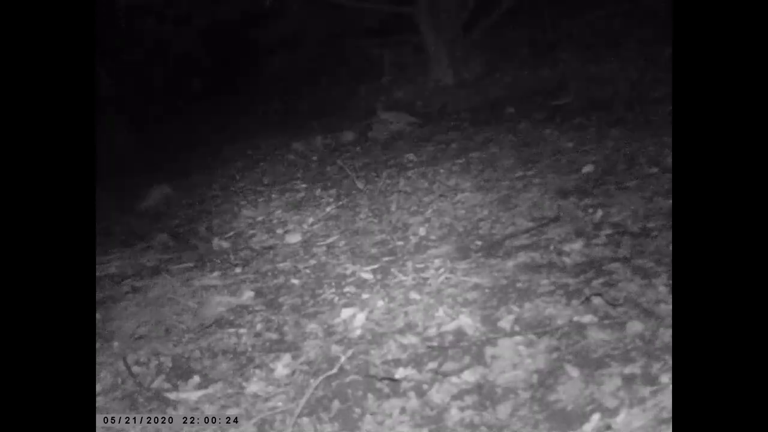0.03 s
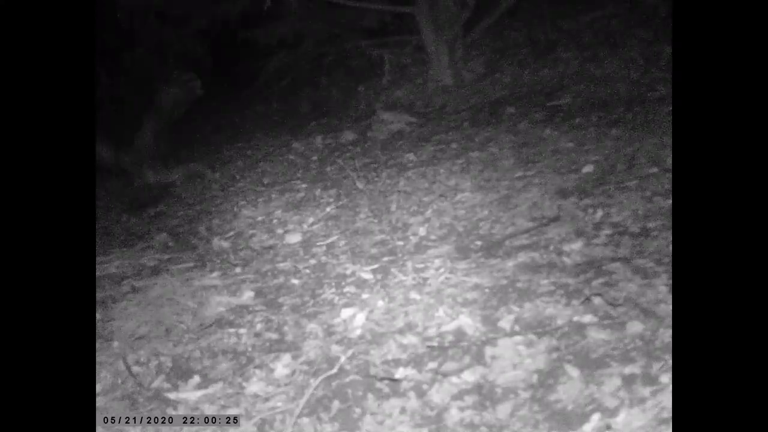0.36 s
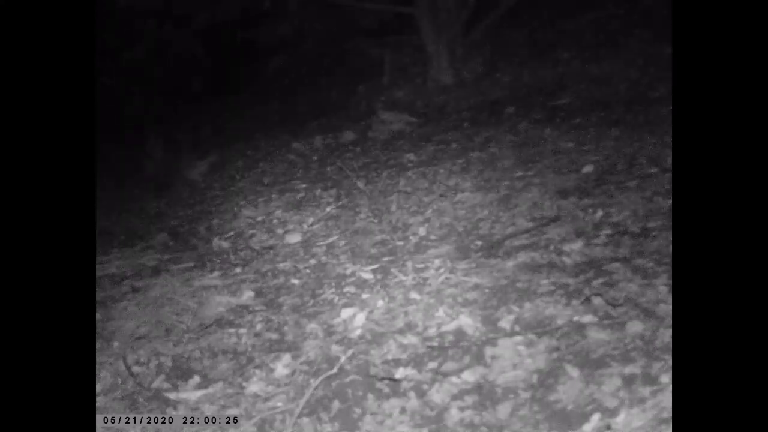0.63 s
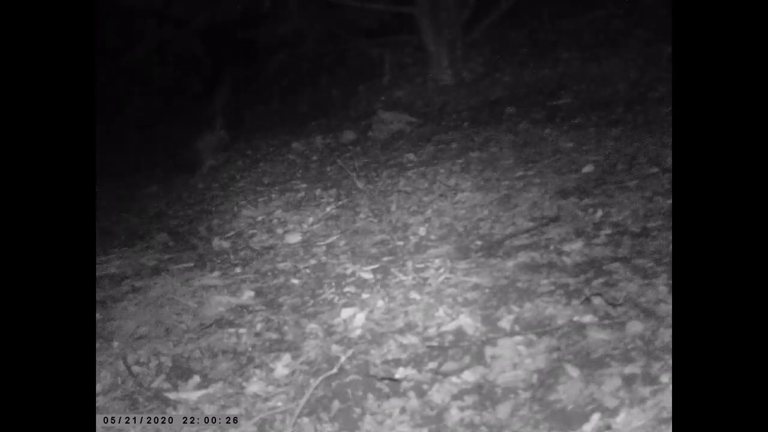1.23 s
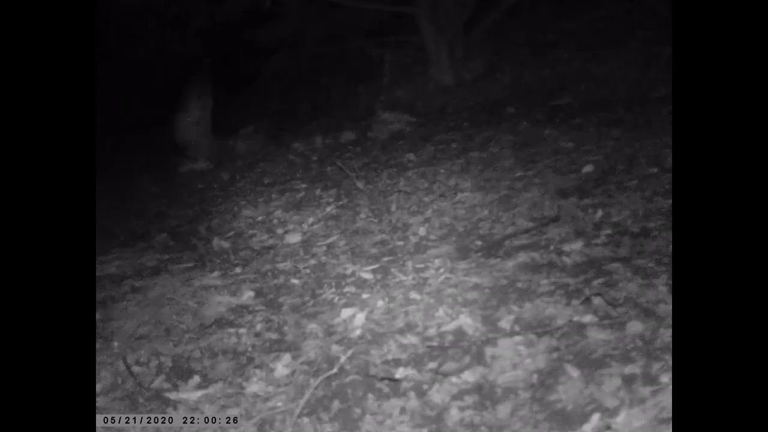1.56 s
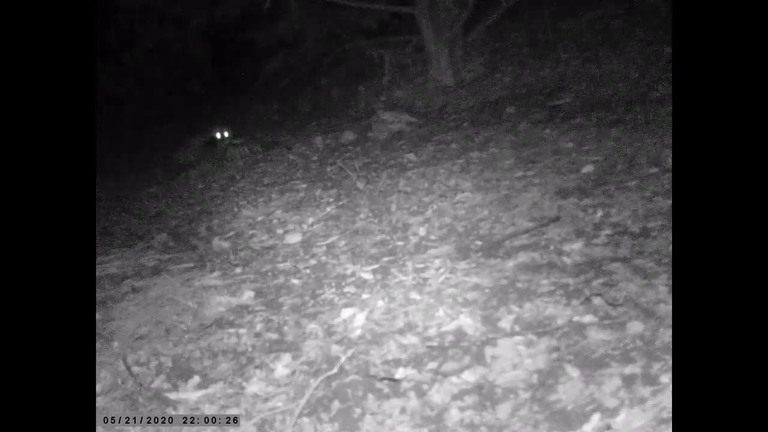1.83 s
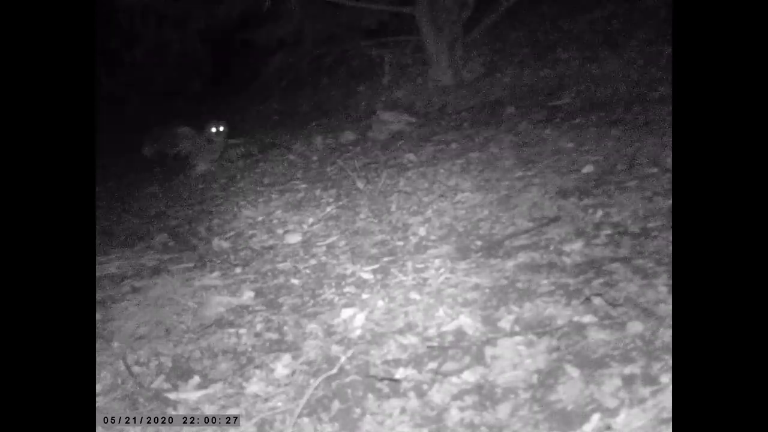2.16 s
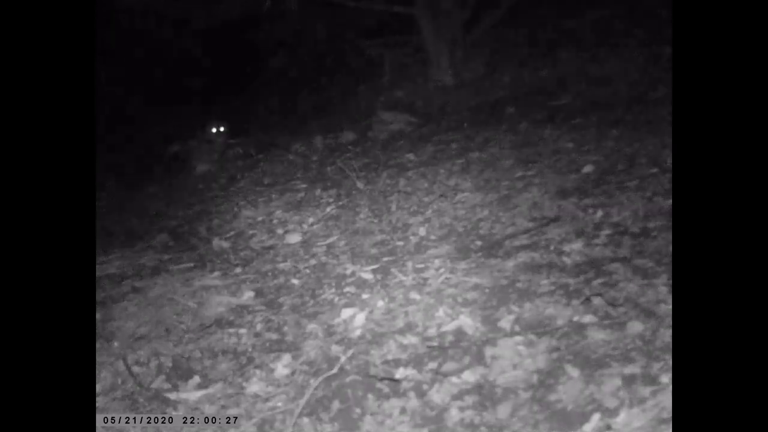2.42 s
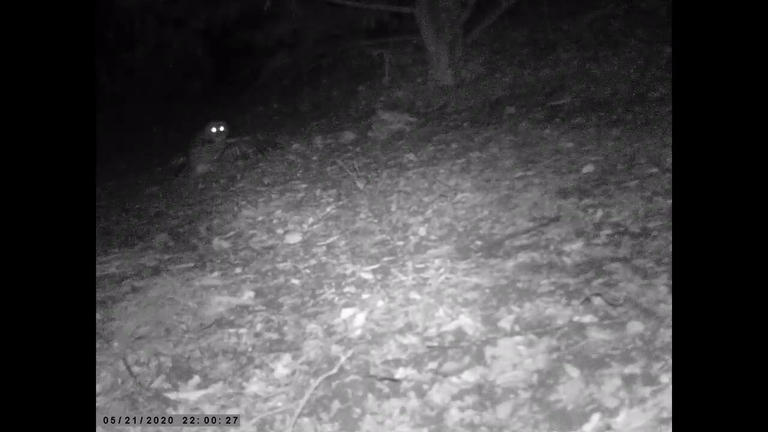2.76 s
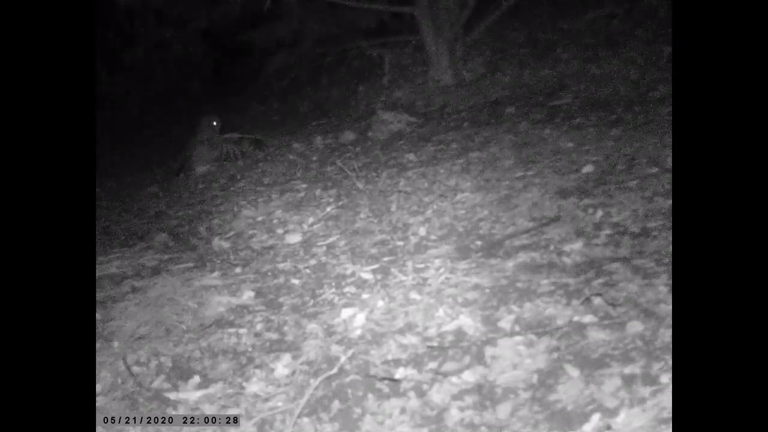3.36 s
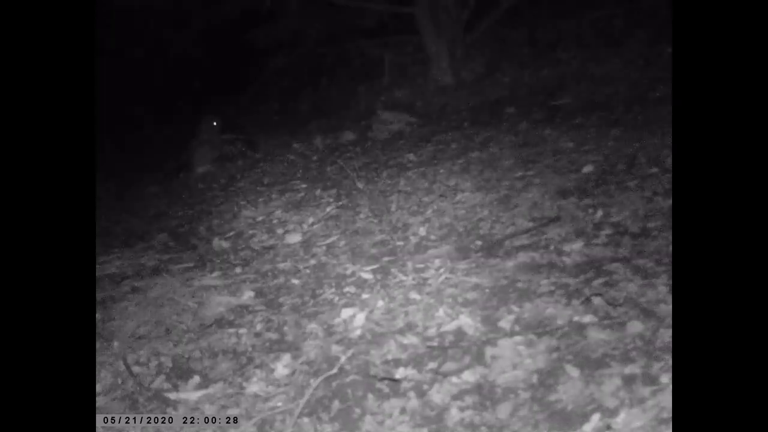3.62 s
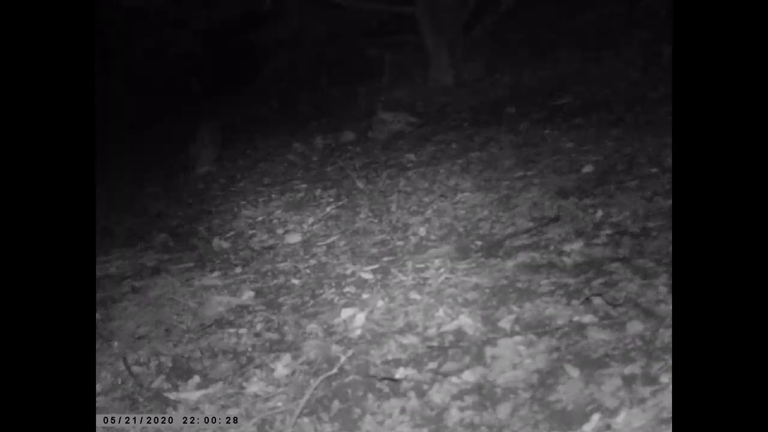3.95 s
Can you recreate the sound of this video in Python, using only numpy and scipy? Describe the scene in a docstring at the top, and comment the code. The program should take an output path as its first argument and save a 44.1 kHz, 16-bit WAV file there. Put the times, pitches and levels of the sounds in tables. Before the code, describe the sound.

A small animal squeals twice, loud and harsh, over steady hiss and low hum.

```python
"""Among trees at night, a small animal squeals twice, well clear of the background. Each cry is a stack of
harmonics shaped by the throat: it starts clear, sinks in pitch and turns hoarse, and the ground, a near trunk
and the wood throw it back to the microphone. Underneath lie the camera's own hiss, rumble and a low hum that
keeps cutting out with soft thumps. Dull bumps, dry leaves and two faint high chirps fill in the background;
brief crackles sound within the cries, and tiny ticks come and go."""
import sys
import numpy as np
from scipy import signal
from scipy.fft import rfft, irfft
from scipy.io import wavfile
from scipy.ndimage import uniform_filter1d

SR = 44100
rng = np.random.default_rng(int(sys.argv[2]) if len(sys.argv) > 2 else 0)


def generate_wav(sig):
    """Save sig (samples, or channels by samples) to the path in sys.argv[1] as 16-bit PCM at SR."""
    pcm = np.round(np.clip(np.atleast_2d(sig).T, -1, 1) * 32767).astype(np.int16)
    wavfile.write(sys.argv[1], SR, pcm)


N = 176400

# the two cries, direct to the microphone
# (time [s], pitch [Hz], level [dB], roughness [0-1], pinch of the throat [0-1])
SQUEALS = [
    [(.879, 1037, -51, 0.1, 0.1), (.886, 1001, -29, 0, 0.1), (.912, 972, -24, 0.1, 0.1),
     (.944, 933.5, -19, .06, 0), (.963, 910, -16.5, 0.1, 0.15), (.975, 896.5, -19.5, 0.2, 0.2),
     (.998, 871, -17, 0.2, 0.3), (1.02, 852, -16, 0.22, 0.43), (1.03, 819, -17.5, 0.24, 0.1),
     (1.048, 818, -14.5, 0.26, 0.1), (1.058, 790.6, -15, 0.28, 0.2), (1.078, 791, -13.5, 0.14, 0),
     (1.096, 785.4, -19, 0.38, 0.4), (1.112, 775, -22.5, .5, 0.6), (1.128, 797, -18.5, 0.4, 0.35),
     (1.137, 752, -28.5, 1, 0.7)],
    [(1.288, 912, -46, 0.04, 0.03), (1.299, 937, -30.5, 0.14, 0), (1.339, 945.4, -19.5, 0, 0),
     (1.359, 908, -20.5, 0.03, 0), (1.371, 898.5, -18.5, 0.02, 0), (1.385, 919, -23.5, 0.2, 0.5),
     (1.401, 943, -20.5, .1, 0.1), (1.439, 869, -23, 0, 0), (1.467, 878.4, -17.5, .1, 0.05),
     (1.482, 875, -14.5, 0, 0.14), (1.492, 799, -21, 0.56, 0.2), (1.504, 807, -25, 0.7, 0.6),
     (1.52, 772, -21, 0.3, 0.5), (1.536, 701, -23, 0.26, 0.77), (1.552, 707, -21, 0.58, 0.85),
     (1.563, 761, -26.5, 0.26, 1), (1.59, 701, -20.5, 0.14, 0.5), (1.606, 598, -25, 1, 0.65)],
]
# colour of the rasp ahead of the throat (frequency [Hz], gain [dB])
RASP_SPECTRUM = [(500, 3), (1500, -7), (2500, -6), (5000, 1), (12000, -4)]
RELEASE_S, WAVER_SHARE, FLUTTER_DB, FLUTTER_HZ = 0.0046, 0.0033, 1.5, 44.7
# hoarseness at full roughness
WOBBLE_SHARE, WOBBLE_HZ, JITTER_SHARE, SHIMMER_SHARE, HALF_TONE_DB = 0.022, 98, 0.016, 0.38, -18


def cry(t, rows):
    """Harmonics through the throat; roughness shakes the pitch and adds half tones and pulsing rasp."""
    times, *columns = np.array(rows, float).T
    hz, db, rough, pinch = (np.interp(t, times, column) for column in columns)
    outside_s = np.maximum(times[0] - t, 0) + np.maximum(t - times[-1], 0)
    envelope = undb(db) * np.exp(-(outside_s / RELEASE_S) ** 2)
    on = outside_s < 3 * RELEASE_S
    shake = WOBBLE_SHARE * np.sin(2 * np.pi * WOBBLE_HZ * t + walk(22)) + JITTER_SHARE * walk(350)
    pitch = hz * (1 + WAVER_SHARE * walk(109) + rough * shake)
    phase = 2 * np.pi * np.cumsum(pitch) / SR
    order = np.arange(2, 53)[:, None] / 2  # harmonics, with half tones midway between them
    partial_hz = order * hz[on]
    flutter = np.array([walk(FLUTTER_HZ)[on] for _ in order])
    weight = throat(t[on], partial_hz, pinch[on]) * undb(FLUTTER_DB * flutter) * (partial_hz < SR / 2)
    weight[1::2] *= undb(HALF_TONE_DB) * np.sqrt(rough[on]) * walk(70)[on]
    partials = weight * np.sin(order * phase[on] + order ** 2 / 2)
    voice = np.zeros(N)
    voice[on] = partials.sum(0) / np.sqrt((weight ** 2).sum(0) / 2)  # rms 1
    rasp = (1 - pinch) * noise(OPEN_THROAT, RASP_SPECTRUM) + pinch * noise(PINCHED_THROAT, RASP_SPECTRUM)
    rasp *= 1 + 0.37 * np.cos(phase)  # pulses at the pitch
    shimmer = 1 + SHIMMER_SHARE * rough * walk(220)
    return envelope * (voice * shimmer + rough * rasp)


# resonances of the throat, open and pinched (frequency [Hz], gain [dB])
OPEN_THROAT = [(700, -14.5), (1800, -16.5), (2500, -13.5), (3050, -8.5), (3700, -17.5), (4700, -15.5),
               (5600, -0.5), (6400, 3.5), (7100, -3), (7650, -14.5), (8600, -5.5), (9600, -10),
               (11000, -22), (12300, -23.5), (15500, -33)]
PINCHED_THROAT = [(700, -17), (1400, -18), (2200, -12), (2900, -10), (3500, -9.5), (4200, -11.5),
                  (5500, -15.5), (6500, -9), (7050, 3), (7700, -11), (8900, -19.5), (10400, -12),
                  (12500, -25.5), (15500, -36)]
# lift of its resonance near 3 kHz and of its treble (time [s], gain [dB])
RESONANCE_LIFT = [(.9, -1.5), (.95, 3), (1.015, -8), (1.03, 4), (1.09, 6), (1.135, 5.5), (1.305, 24),
                  (1.345, 0), (1.38, 3), (1.41, 7), (1.44, 3), (1.56, -10), (1.6, 6)]
TREBLE_LIFT = [(.92, 1.5), (.955, 3.5), (1, -2.5), (1.08, -1), (1.11, 7), (1.135, -2), (1.3, 3), (1.34, 3),
               (1.41, 6), (1.445, -2), (1.475, 4), (1.51, 5.5), (1.57, 5), (1.6, 5)]
RESONANCE_HZ, RESONANCE_WIDTH_HZ, TREBLE_HZ, TREBLE_EDGE_HZ = 3100, 570, 7840, 300


def throat(t, hz, pinch):
    """Gain of the throat as it moves between its open and pinched shapes."""
    shape = (1 - pinch) * gain_at(OPEN_THROAT, hz) + pinch * gain_at(PINCHED_THROAT, hz)
    peak = np.exp(-((hz - RESONANCE_HZ) / RESONANCE_WIDTH_HZ) ** 2)
    shelf = (1 + np.tanh((hz - TREBLE_HZ) / TREBLE_EDGE_HZ)) / 2
    return shape * undb(db_at(RESONANCE_LIFT, t) * peak + db_at(TREBLE_LIFT, t) * shelf)


WOOD_DB, WOOD_T60_S, WOOD_DAMP_HZ = -17, .35, 6060
GROUND_DB, GROUND_DECAY_S, TRUNK_DB, TRUNK_DELAY_S = -10, 0.012, -22, 0.021


def trees(t, direct):
    """The direct sound, scatter off leafy ground, a near trunk's echo and a duller tail from the wood."""
    wood = noise([(500, 0), (WOOD_DAMP_HZ, 0), (15000, -14)])
    wood *= undb(-60 * t / WOOD_T60_S) * (1 - np.exp(-t / 0.011))
    ground = rng.standard_normal(N) * np.exp(-t / GROUND_DECAY_S)
    response = (undb(WOOD_DB) * unit(wood) + undb(GROUND_DB) * unit(ground)) / np.sqrt(N)
    trunk = np.roll(uniform_filter1d(direct, size=3), int(TRUNK_DELAY_S * SR))
    return direct + undb(TRUNK_DB) * trunk + signal.fftconvolve(direct, response)[:N]


# the camera's hum (frequency [Hz], level [dB]) and the gaps in it (start [s], end [s])
HUM_LINES = [(90.1, -23.5), (61, -32), (120.3, -44.5), (148.2, -49), (181.2, -47)]
HUM_GAPS = [(.205, .255), (.6, .705), (.845, .945), (1.245, 1.345), (1.38, 1.462), (1.51, 1.585),
            (1.915, 2.012), (2.205, 2.325), (2.585, 2.675), (2.845, 2.886), (3.245, 3.34), (3.38, 3.465),
            (3.51, 3.59), (3.915, 4.05)]
# its rumble: colour (frequency [Hz], gain [dB]) and course before the dips (time [s], level [dB])
RUMBLE_SPECTRUM = [(15, 0.5), (40, 4.5), (80, -1.5), (120, -7.5), (170, -15), (250, -22.5), (400, -33),
                   (800, -53), (2000, -80)]
RUMBLE_COURSE = [(0, -16), (.6, -25), (1.2, -22), (1.85, -20.5), (2.25, -21.5), (2.36, -23), (2.6, -17),
                 (2.84, -20), (3, -21.5), (3.4, -22), (4, -24.5)]
OFF_THUMP_DB, OFF_THUMP_S, ON_THUMP_DB, ON_THUMP_S, RUMBLE_DIP_DB = -9.5, 0.0092, -10, 0.01, -6


def camera_hum(t):
    """In each gap the hum cuts out and the rumble dips, with a thump going out and one coming back."""
    running, thumps = np.ones(N), np.zeros(N)
    for start, end in HUM_GAPS:
        running *= (t < start) | (t > end)
        thumps -= undb(OFF_THUMP_DB) * thump(t, start, OFF_THUMP_S)
        thumps += undb(ON_THUMP_DB) * thump(t, end, ON_THUMP_S)
    running = uniform_filter1d(running, size=500)  # 11 ms fades
    hum = sum(np.sqrt(2) * undb(db) * np.sin(2 * np.pi * hz * t + 0.067 * walk(3.7))
              for hz, db in HUM_LINES)
    rumble = noise(RUMBLE_SPECTRUM) * undb(db_at(RUMBLE_COURSE, t) + RUMBLE_DIP_DB * (1 - running))
    return hum * running + rumble + uniform_filter1d(thumps, size=200)


def thump(t, start, rise_s):
    """A soft one-sided swing."""
    age = np.maximum(t - start, 0) / rise_s
    return age * np.exp(1 - age)


# dull bumps after the cries (time [s], level [dB]) and their colour (frequency [Hz], gain [dB])
BUMP_HITS = [(1.986, -26), (2.357, -19.5), (2.45, -30), (2.532, -25), (2.728, -26), (2.835, -19),
             (2.95, -25)]
BUMP_S, BUMP_SPECTRUM = 0.016, [(50, -1.5), (150, 8.5), (260, -7), (400, -28), (800, -44), (2000, -76)]


def bumps(t):
    """Short swells of low noise."""
    return noise(BUMP_SPECTRUM) * bells(t, BUMP_HITS, BUMP_S)


# crackles within the cries (time [s], level [dB]) and their colour (frequency [Hz], gain [dB])
CRACKLE_HITS = [(0.962, -30.5), (1.066, -28), (1.492, -32)]
CRACKLE_S, CRACKLE_SPECTRUM = 0.0028, [
    (300, -4.5), (550, -6), (750, 4.5), (1300, -13), (4000, -22), (9000, -17), (14500, -18)]


def crackles(t):
    """Bursts of broad noise a few milliseconds long."""
    return noise(CRACKLE_SPECTRUM) * bells(t, CRACKLE_HITS, CRACKLE_S)


# noise floor of the camera (frequency [Hz], gain [dB])
HISS_SPECTRUM = [(400, -6), (600, -7), (1240, -8), (2290, -7.5), (4000, -11), (5820, -13), (7100, -17),
                 (9000, -27), (11800, -38), (14100, -39), (15500, -46)]


def camera_hiss(level_db=-45, waver_db=1):
    """Steady hiss that wavers slightly in level."""
    return noise(HISS_SPECTRUM) * undb(level_db + waver_db * walk(10))


# dry leaves, faint at the microphone (time [s], level [dB]); their colour (frequency [Hz], gain [dB])
LEAF_COURSE = [(0, -56), (.3, -60), (.55, -65), (.8, -49.5), (1.3, -71), (2, -62), (2.5, -60), (3, -65),
               (3.75, -58.5), (4, -53.5)]
LEAF_GRAIN_DB, LEAF_SPECTRUM = 4.5, [
    (300, -0.5), (900, 7), (3000, -13.5), (7000, -7), (10500, -15.5), (15000, -31)]


def leaves(t):
    """A rustle: noise made grainy by a fast flicker in level."""
    return noise(LEAF_SPECTRUM) * unit(undb(LEAF_GRAIN_DB * walk(120))) * undb(db_at(LEAF_COURSE, t))


# faint ticks (time [s], level [dB]) and their colour (frequency [Hz], gain [dB])
TICK_HITS = [(0.189, -42), (0.269, -33.5), (0.406, -38), (.458, -39), (.858, -38), (2.025, -39),
             (2.688, -43), (2.901, -41)]
TICK_SPECTRUM = [(1500, -10), (4000, 6), (9000, -1), (15000, -14)]


def ticks(t, decay_s=.0009):
    """Tiny dry clicks: bright noise that starts sharply and dies at once."""
    envelope = sum(undb(db) * (t >= at) * np.exp(-np.abs(t - at) / decay_s) for at, db in TICK_HITS)
    return noise(TICK_SPECTRUM) * envelope


# high chirps that barely reach the microphone (time [s], level [dB])
CHIRP_NOTES = [(2.286, -59), (2.642, -58)]


def chirps(t, peak_hz=7060, arch_hz=40, half_width_s=.015, overtone_db=-10):
    """Thin, slightly arched whistles with one overtone."""
    whistles = np.zeros(N)
    for at, db in CHIRP_NOTES:
        bell = np.exp(-((t - at) / half_width_s) ** 2)
        phase = 2 * np.pi * np.cumsum(peak_hz - arch_hz * (1 - bell)) / SR
        whistles += undb(db) * bell * (np.sin(phase) + undb(overtone_db) * np.sin(2 * phase))
    return whistles


def undb(db):
    """Decibels to gain."""
    return 10 ** (np.asarray(db) / 20)


def unit(x):
    """Scale to rms 1."""
    return x / np.sqrt(np.mean(x ** 2))


def db_at(points, t):
    """Decibels along a (time [s], level [dB]) curve."""
    return np.interp(t, *np.array(points).T)


def gain_at(points, hz):
    """Linear gain along a (frequency [Hz], gain [dB]) curve."""
    f, db = np.array(points, float).T
    return undb(np.interp(np.log(hz + 1), np.log(f), db))


def bells(t, rows, half_width_s):
    """An envelope with one bell shape for each (time [s], level [dB])."""
    return sum(undb(db) * np.exp(-((t - at) / half_width_s) ** 2) for at, db in rows)


def noise(*colours):
    """Noise shaped by one or more (frequency [Hz], gain [dB]) curves, rms 1."""
    gain = np.prod([gain_at(c, np.fft.rfftfreq(N, 1 / SR)) for c in colours], axis=0)
    return unit(irfft(rfft(rng.standard_normal(N)) * gain, N))


def walk(hz):
    """Smooth random motion up to a given rate, rms 1."""
    f = np.fft.rfftfreq(N, 1 / SR)
    return unit(irfft(rfft(rng.standard_normal(N)) / (1 + (f / hz) ** 4), N))


def scene():
    """One microphone among the trees: the cries and small noises over the camera's hiss and hum."""
    t = np.arange(N) / SR
    animal = trees(t, sum(cry(t, rows) for rows in SQUEALS))
    hiss = camera_hiss()
    small_noises = leaves(t) + ticks(t) + chirps(t) + bumps(t) + crackles(t)
    return (animal + hiss + camera_hum(t) + small_noises)[None]


CEILING, TOP_HZ = 0.68, 15600


def record(dry):
    """The camera rounds the highest peaks, so the hum shakes the cries a little, and cuts the top."""
    rounded = CEILING * np.tanh(dry / CEILING)
    return signal.sosfilt(signal.ellip(10, .1, 80, TOP_HZ, fs=SR, output="sos"), rounded)


dry = scene()
out = record(dry)
generate_wav(out)
```